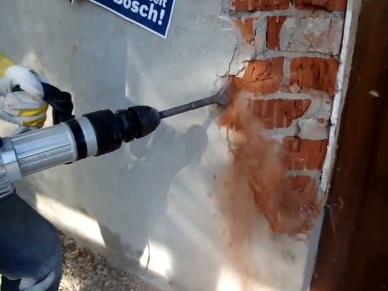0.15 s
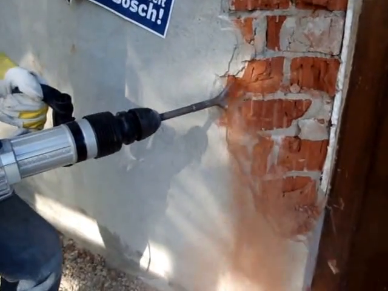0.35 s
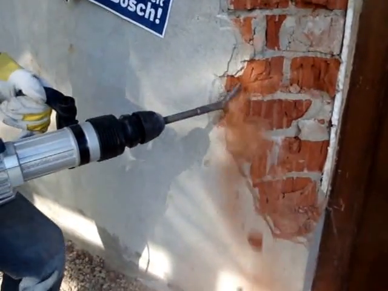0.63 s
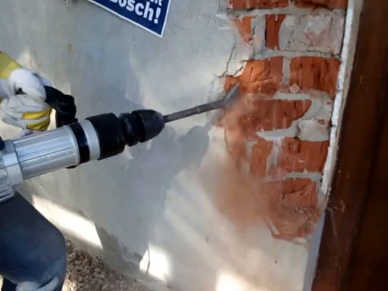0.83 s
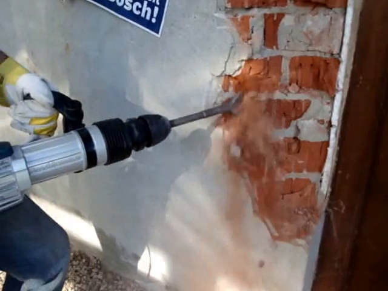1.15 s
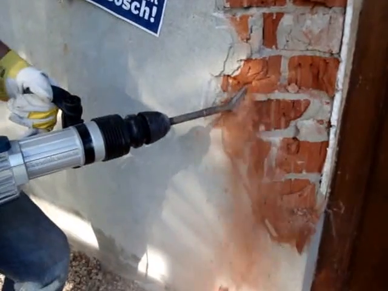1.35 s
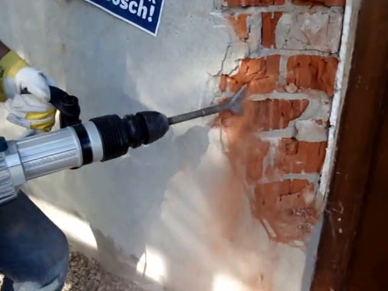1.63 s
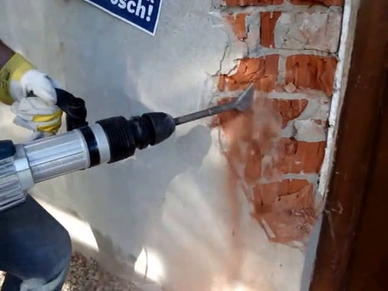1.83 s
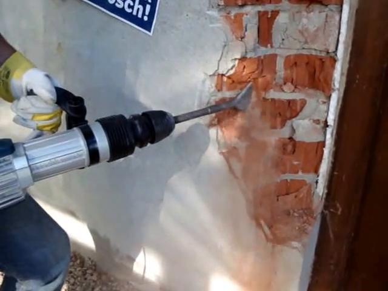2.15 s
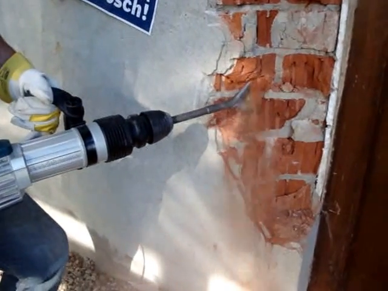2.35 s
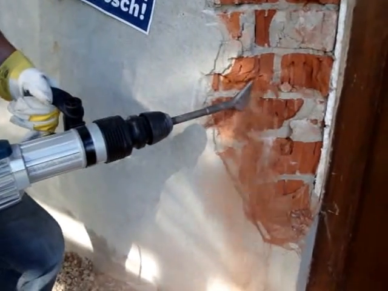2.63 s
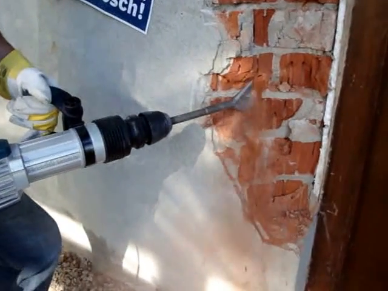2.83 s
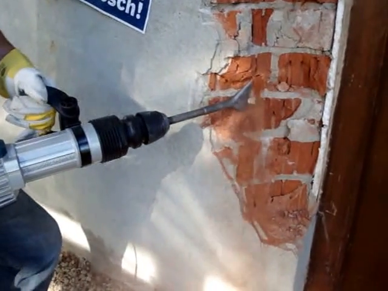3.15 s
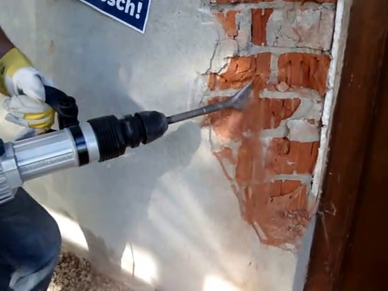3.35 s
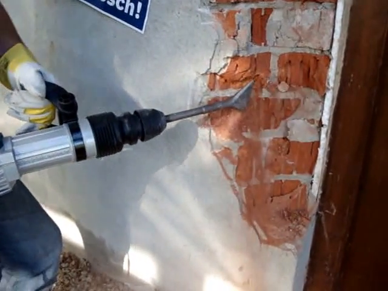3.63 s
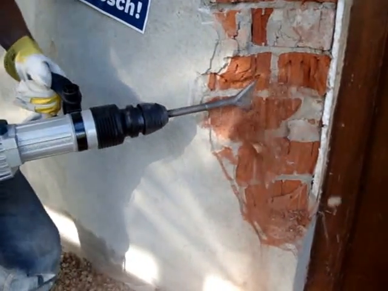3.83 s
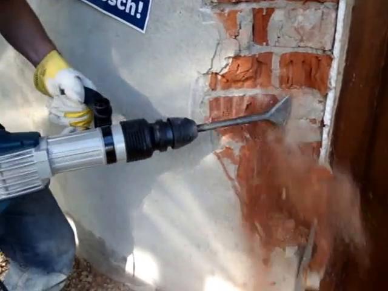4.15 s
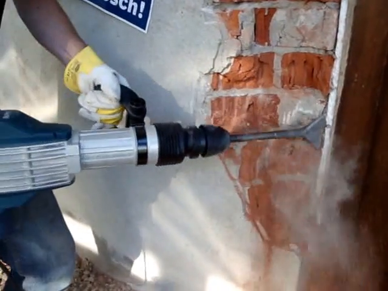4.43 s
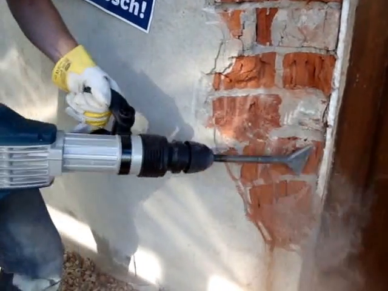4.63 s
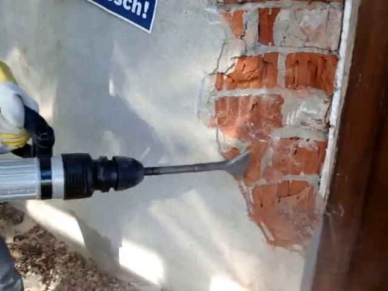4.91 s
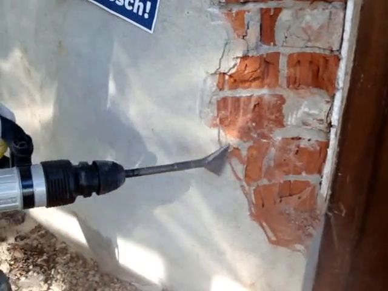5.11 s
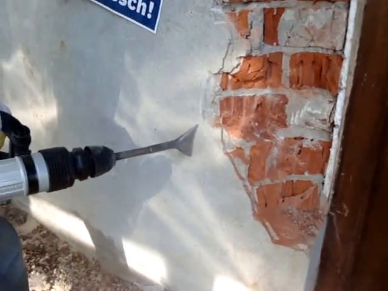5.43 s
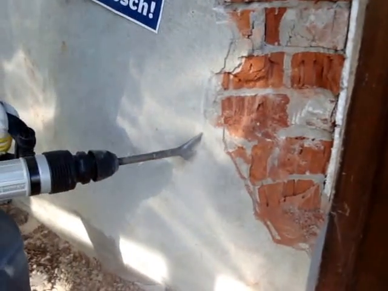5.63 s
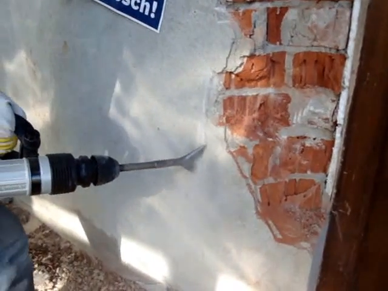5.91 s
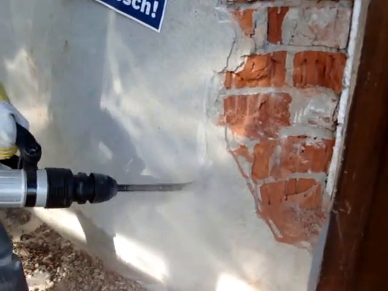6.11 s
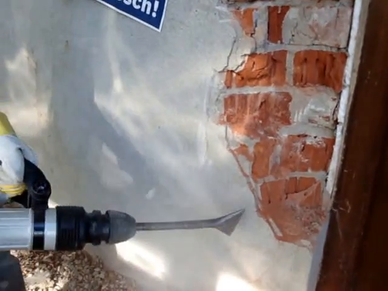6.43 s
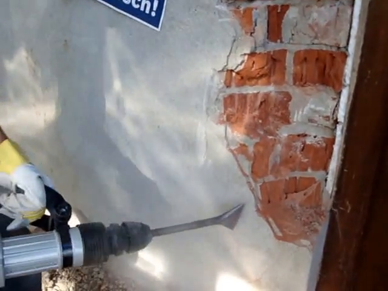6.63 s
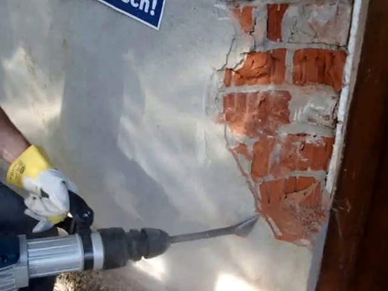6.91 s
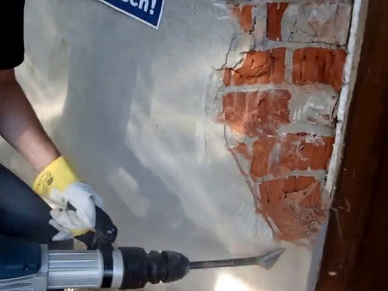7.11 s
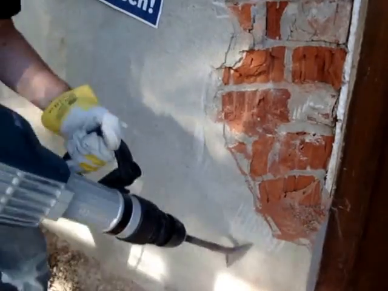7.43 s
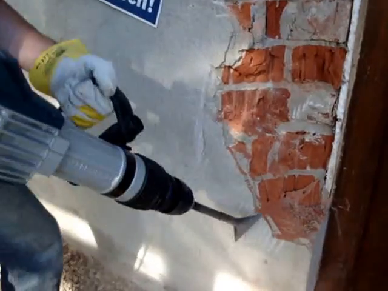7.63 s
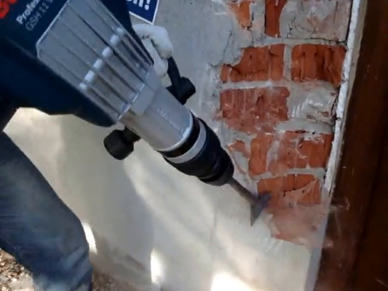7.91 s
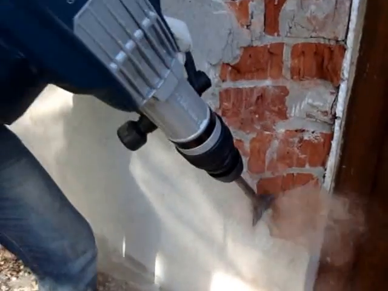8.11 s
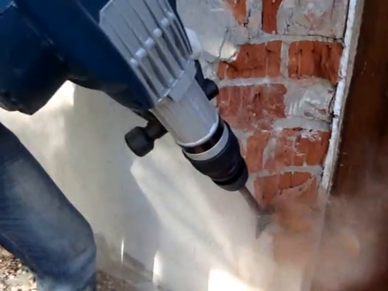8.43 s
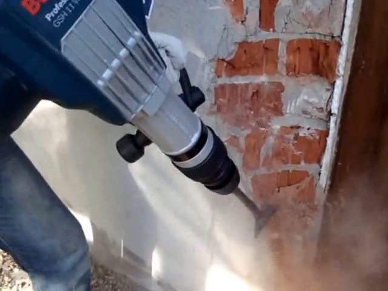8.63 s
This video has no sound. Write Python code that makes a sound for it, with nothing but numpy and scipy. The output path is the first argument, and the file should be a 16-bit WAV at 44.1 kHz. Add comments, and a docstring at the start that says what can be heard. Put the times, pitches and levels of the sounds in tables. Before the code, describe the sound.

An electric demolition hammer chisels plaster off a brick wall, close to the microphone. Very fast blows crack and crunch on the masonry while the steel chisel rings and chips split off. After one long run the tool is lifted three times. Each time its motor whine rises and the gears rattle louder, until a brief squeak and a knock start another short burst of hammering.

```python
"""At a brick wall, one microphone close by: an electric demolition hammer chisels off plaster. About 26 blows a
second crack on the masonry, crush grit and ring the steel chisel, which chatters when it sits loose. Chips
split off and pieces thud to the ground. Three times the tool is lifted: the motor overshoots its free speed,
and the noise swells steadily until a squeak and a knock set it hammering again."""
import sys
import numpy as np
from scipy import signal
from scipy.fft import rfft, irfft, next_fast_len
from scipy.io import wavfile
from scipy.ndimage import uniform_filter1d, map_coordinates

SR = 44100
rng = np.random.default_rng(int(sys.argv[2]) if len(sys.argv) > 2 else 0)


def master(y):
    """Save y as 16-bit WAV."""
    cut = np.clip(np.atleast_2d(y).T, -1, 1)
    pcm = np.round(cut * 32767)  # scale
    wavfile.write(sys.argv[1], SR, pcm.astype(np.int16))


N = 386757
TIME = np.arange(N) / SR
TOP_HZ = 10070  # the microphone's band limit
WHINE_CYCLES_PER_BLOW = 182.6


def amp(db):
    return 10 ** (np.asarray(db) / 20)


def unit(x):
    return x / np.sqrt(np.mean(x ** 2) + 1e-20)


def fade(t, t60):
    return 10 ** (-3 * t / t60)


def curves(rows, at=TIME):
    """Each column after the time, read at the given moments."""
    times, *columns = np.transpose(rows)
    return [np.interp(at, times, column) for column in columns]


def wobble(rate):
    """A smooth random curve, rate knots a second."""
    return map_coordinates(rng.standard_normal(int(N * rate / SR) + 4), [TIME * rate])


def coloured(x, points):
    """x through a causal filter of unit energy shaped by (freq_hz, gain_db) points."""
    size = 2 * next_fast_len(N // 2 + 8192)
    hz, db = np.transpose(points)
    log_hz = np.log(np.fft.rfftfreq(size, 1 / SR) + 1)
    gain = unit(amp(np.interp(log_hz, np.log(hz), db)))
    cepstrum = irfft(np.log(gain))
    cepstrum[1:size // 2] *= 2  # folded for minimum phase
    cepstrum[size // 2 + 1:] = 0
    return irfft(rfft(x, size) * np.exp(rfft(cepstrum)))[:N]


def placed(times, sounds):
    """The sum of short sounds (one a row), each starting at its time."""
    index = np.round(times * SR).astype(int)[:, None] + np.arange(sounds.shape[1])
    return np.bincount(index.clip(0).ravel(), sounds.ravel(), N)[:N]


def struck(blows, db, hz, t60):
    """One mode, rung by every blow; it starts at full swing and so pushes no steady air."""
    t = np.arange(SR // 5) / SR
    swing = np.cos(2 * np.pi * hz * t) * np.where(t > 0, 1, .5)
    return placed(blows, amp(db)[:, None] * fade(t, t60) * swing)


def burst_noise(blows, t, alike):
    """One noise per blow; the share `alike` of its power repeats from blow to blow."""
    repeated = np.sqrt(alike) * rng.standard_normal(len(t))
    return repeated + np.sqrt(1 - alike) * rng.standard_normal((len(blows), len(t)))


# motor speed under load, heard as the fan's whine: time_s, pitch_hz
LOADED_WHINE = [(0, 4831), (2.6, 4808), (4.1, 4780), (4.16, 4920), (4.21, 4780), (4.4, 4765), (5.5, 4800),
                (8.77, 4770)]
# gear rattle under load: time_s, level_db
LOADED_RATTLE = [(0, -32.5), (1.2, -32.5), (1.8, -33), (2.6, -35), (3.5, -34), (4.4, -33.5), (5.5, -32.5),
                 (6.1, -33), (7, -30), (8, -31), (8.7, -31)]
# the tool comes off the wall and runs free; the jolt of the next catch takes a share of its extra speed:
# start_s, rattle_db, swell_db_per_s, air_over_rattle_db, jolt_share, settle_s
TOOL_LIFTS = [(4.441, -35.5, 16.5, -3, 0.028, .22), (6.192, -39, 22.5, -4, .3, .07),
              (7.203, -38, 31, -5.5, .42, .085)]

def drive():
    """Whine pitch, rattle level and fan air level: all rise at each lift and settle after the catch."""
    free_hz, half_swing_s, swing_decay_s = 5250, .36, .29  # the governor overshoots and swings back
    unload_s, rattle_top_db, hush_ratio = .01, -19, 1.33  # noise settles faster than speed
    loaded_hz, = curves(LOADED_WHINE)
    whine_hz, gear_db, air_db = loaded_hz, curves(LOADED_RATTLE)[0], -76
    for (lift, start_db, swell, hiss_db, jolt, settle), (catch, *_) in zip(TOOL_LIFTS, STRIKER_CATCHES):
        t = TIME.clip(lift, catch) - lift
        since_knock = (TIME - catch - KNOCK_LAG_S).clip(0)
        lingering = (1 - jolt * (1 - fade(since_knock, .023))) * np.exp(-since_knock / settle)
        spin_up = 1 - np.exp(-t / swing_decay_s) * np.cos(np.pi * t / half_swing_s)
        whine_hz = whine_hz + (free_hz - loaded_hz) * spin_up * lingering
        free = (1 - np.exp(-t / unload_s)) * lingering ** hush_ratio
        free_db = start_db + swell * t
        gear_db = gear_db + free * (np.minimum(free_db, rattle_top_db) - gear_db)
        air_db = air_db + free * (free_db + hiss_db - air_db)
    return whine_hz, gear_db, air_db


# the fan's outlet turns toward and away from the microphone: time_s, whine_over_rattle_db
WHINE_AIM = [(0, -5), (.3, -3), (.62, -2), (.85, -13), (1.08, -7), (1.4, -6), (1.9, -4), (2.35, -11),
             (2.8, -3), (3.5, -7.5), (4, -5.5), (4.16, -2), (4.3, -6), (4.5, -7), (4.78, -1.5), (5.2, -0.5),
             (5.4, -7), (5.47, -7.5), (5.65, -20), (6.1, -10), (6.5, 0), (6.65, -1.5), (6.82, -12),
             (6.9, -7), (7.3, -11.5), (7.48, 1.5), (7.7, -2), (7.93, 2.5), (7.97, -0.5), (8.25, 1.5),
             (8.77, -1.5)]
# spectra of the gear rattle, the fan's hiss and its drone: freq_hz, gain_db
GEAR_SPECTRUM = [(200, -45), (700, -5.5), (1000, -6), (1100, 5), (1190, 1.5), (1300, 3.5), (1450, 1.5),
                 (1600, 6), (1800, 4.5), (2150, 7), (2900, 5), (3400, 4.5), (4000, 0.5), (5000, -2.5),
                 (8000, -45.5)]
HISS_SPECTRUM = [(300, -39), (1000, 3.5), (3000, -15.5), (5300, 6), (6500, 4), (8500, 2), (9300, -2),
                 (10000, -1)]
DRONE_SPECTRUM = [(20, -34.5), (160, -17), (300, -6), (480, 5.5), (850, 9.5), (1300, -9), (3000, -16)]

def motor(whine_hz, gear_db, air_db, blows):
    """Gears rattle in time with the crank; the fan hisses, drones and whines with the shaft speed."""
    whine_db = gear_db + curves(WHINE_AIM)[0]
    strain = np.interp(whine_hz, [4800, 5200], [1, 0])
    fan_phase = 2 * np.pi * np.cumsum(whine_hz * (1 + .000894 * wobble(60))) / SR
    turn = fan_phase / WHINE_CYCLES_PER_BLOW
    throb_db = np.sin(turn) + .49 * np.sin(2 * turn)
    rattle = rng.standard_normal(N) * amp(throb_db + 2.6 * wobble(450))
    gears = amp(gear_db) * unit(coloured(rattle, GEAR_SPECTRUM))
    air = amp(air_db) * coloured(rng.standard_normal(N), HISS_SPECTRUM)
    drone = amp(.72 * air_db - 24.5) * coloured(rng.standard_normal(N), DRONE_SPECTRUM)
    whine = amp(whine_db - 1.4 * strain) * fan_whine(fan_phase, stroke_angle(blows), strain)
    return gears + air + drone + whine


def fan_whine(phase, stroke, strain):
    """Blade tone and a weak lower partner, rough with turbulence; each compression slows the shaft."""
    sway = -1.2 * strain * np.sin(stroke) + (.45 - .1 * strain) * wobble(220)
    partner = amp(-16 + 4 * wobble(50)) * np.sin(phase * 11 / 13 + sway + wobble(110))
    turbulence = amp(2.3 * wobble(70) + 1.5 * wobble(300) - .5)
    return turbulence * unit(np.sin(phase + sway) + partner)


def gear_mesh(whine_hz, blows):
    """The first gear stage sings; under load its level and pitch swing twice a stroke."""
    mesh_ratio, loaded_db, free_db = 3 / 7, -41.5, -46
    stroke = stroke_angle(blows)
    strain = np.interp(whine_hz, [4900, 5200], [1, 0])
    hz = mesh_ratio * whine_hz * (1 + .022 * strain * np.sin(2 * stroke) + .008 * wobble(150))
    swell_db = loaded_db - 8.3 * np.cos(2 * stroke) - 2.6 * np.sin(stroke)
    level_db = free_db + strain * (swell_db - free_db) + 3 * wobble(120)
    return amp(level_db) * np.sin(2 * np.pi * np.cumsum(hz) / SR)


def stroke_angle(blows):
    """The crank's angle, a whole turn from one blow to the next."""
    return np.interp(TIME, blows, np.arange(len(blows))) * 2 * np.pi


# runs of hammering on the wall: first_blow_s, last_blow_s
HAMMER_RUNS = [(0.0265, 4.0885), (4.163, 4.4710), (5.4450, 6.1840), (6.8460, 7.1860), (7.9547, 8.7540)]

def blow_times(whine_hz):
    """The striker hits the chisel once per crank turn, from the first blow of a run to its last."""
    turns = np.cumsum(whine_hz) / SR / WHINE_CYCLES_PER_BLOW
    spans = [np.interp(run, TIME, turns) for run in HAMMER_RUNS]
    blow_turns = [np.linspace(first, last, round(last - first) + 1) for first, last in spans]
    return np.interp(np.concatenate(blow_turns), turns, TIME)


# how hard the edge bites, full on brick and weak on plaster: time_s, level_db
EDGE_BITE = [(0, -22.5), (.16, -14), (.6, -20), (.95, -18), (1.3, -17), (1.75, -21), (2.07, -21.5),
             (2.5, -24.5), (2.9, -20), (3.15, -18.5), (3.35, -22.5), (3.8, -18.5), (4.3, -20.5),
             (5.5, -16.5), (5.75, -20.5), (6.08, -19), (6.19, -28), (6.9, -22.5), (7.15, -21.5),
             (8.05, -19.5), (8.4, -23), (8.7, -20.5)]
# the dull thud of the wall behind the brick: time_s, level_db
THUD_LEVEL = [(0, -11), (.25, -7.5), (.55, -7.5), (.7, -8), (1.2, -8.5), (1.5, -9), (1.8, -17), (1.95, -9),
              (2.3, -8), (2.5, -5), (3.3, -9), (3.6, -2), (4.05, -14), (5.5, -21.5), (6.1, -20.5),
              (7, -14.5), (8, -1.5), (8.3, -4.5), (8.7, -12.5)]
# the tip rubs on crushed grit and skids on hard brick: time_s, grit_db, skid_db
TIP_RUBBING = [(0, -38, -30.5), (.35, -31.5, -26.5), (.75, -29, -47), (1.05, -34.5, -41),
               (1.25, -30.5, -28), (1.55, -33, -26.5), (1.72, -36.5, -32), (1.95, -31, -42),
               (2.3, -26.5, -42), (2.6, -31, -28), (3.1, -35, -37), (3.65, -30, -32), (3.9, -33, -38),
               (4.3, -36.5, -33.5), (5.45, -28.5, -28.5), (5.7, -32.5, -20), (5.83, -29.5, -31),
               (6.08, -30.5, -29), (6.19, -34, -30), (6.87, -31.5, -30.5), (7.18, -35.5, -30),
               (8, -33, -28), (8.4, -34.5, -32.5), (8.7, -33, -28.5)]
# spectra of a blow, close to the tip: freq_hz, gain_db
CRACK_SPECTRUM = [(20, -29), (60, -17), (130, -23.5), (200, -7), (300, -14.5), (500, -8.5), (1200, 1),
                  (2400, 4.5), (3400, 5.5), (4800, 2), (7000, 11.5), (10000, -11)]
CRUNCH_SPECTRUM = [(200, -35), (600, -22.5), (1300, -10.5), (1900, 3.5), (2400, -8), (3000, -0.5),
                   (3800, -17), (5000, -19), (7500, -2.5), (10000, -7.5)]
THUD_SPECTRUM = [(200, -24.5), (380, -13), (500, -4), (800, -1), (1200, 8.5), (1600, -9), (3000, -35.5)]
WALL_SPECTRUM = [(100, -31.5), (400, -17), (1000, -13.5), (1900, -8), (2500, -0.5), (3100, 0), (3600, -4.5),
                 (4400, -6.5), (5200, -31.5), (8000, -18)]
GRIT_SPECTRUM = [(1500, -24.5), (4000, -0.5), (5100, -4.5), (5650, -1), (6150, -10.5), (6750, -13.5),
                 (7450, 7), (8000, -0.5), (8500, 7), (9200, -7), (9750, -1.5), (10200, -17.5)]
SKID_SPECTRUM = [(4500, -44), (5250, -8.5), (5520, 6), (5720, -1.5), (6000, -3), (6800, -38.5)]

def masonry(blows):
    """The edge cracks and crunches in, the wall thuds and answers, grit hisses and the flat tip rasps."""
    grit_db, skid_db = curves(TIP_RUBBING, blows[:, None])
    bite_db, = curves(EDGE_BITE, blows[:, None])
    thud_db, = curves(THUD_LEVEL, blows[:, None])
    t = np.arange(SR // 12) / SR
    strength, crush, life = rng.standard_normal((len(blows), 3)).T[:, :, None]
    force = amp(bite_db + 1.2 * strength)
    impulses = -(force / force.mean()) ** .7 * amp(.5)
    crack = coloured(placed(blows, impulses), CRACK_SPECTRUM)
    crunch = force * amp(-3.5) * fade(t, t60=.018) * burst_noise(blows, t, alike=.83)
    thud = coloured(placed(blows + .0006, amp(thud_db)), THUD_SPECTRUM)
    answer = force * amp(-5) * fade(t, t60=.055) * burst_noise(blows, t, alike=.72)
    wall = coloured(placed(blows, answer), WALL_SPECTRUM)
    # a loose chisel keeps scraping for longer
    contact_s = (.012 + .016 * looseness(blows)[:, None]) * np.exp(.25 * life)
    contact = fade(t, t60=.38) / (1 + (t / contact_s) ** 6)
    grit = amp(grit_db + 7.2 + 2 * crush) * contact * burst_noise(blows, t, alike=.27)
    crumbling = amp(3.2 * wobble(600) - .3)
    skid = amp(skid_db + .5) * contact * burst_noise(blows, t, alike=.28)
    layers = [(crunch, CRUNCH_SPECTRUM), (grit, GRIT_SPECTRUM), (skid, SKID_SPECTRUM)]
    crushed = sum(coloured(placed(blows, bursts) * crumbling, spectrum) for bursts, spectrum in layers)
    return crack + thud + wall + crushed


# the brick clanks under the edge: time_s, level_db, pitch_hz
BRICK_CLANK = [(0, -36, 2300), (.2, -20.5, 2450), (.48, -30, 2300), (.7, -16, 2350), (.95, -21.5, 2190),
               (1.3, -19, 2310), (1.7, -16, 2590), (1.84, -20.5, 2530), (2.07, -15.5, 2480),
               (2.3, -19.5, 2530), (2.6, -20.5, 2530), (3.1, -22.5, 2610), (3.45, -31, 2480),
               (3.75, -28, 2500), (4.3, -26, 2430), (5.5, -18, 2320), (6.05, -24, 2430), (6.19, -35, 2400),
               (6.9, -26, 2400), (7.15, -30, 2430), (8.05, -18, 2130), (8.4, -25, 2203), (8.7, -21, 2300)]
# its partials, the lowest rung as the edge slips and bites again: pitch_ratio, gain_db, t60_s, delay_s
CLANK_PARTIALS = [(.77, -4.5, 0.011, .0036), (.79, 1, 0.0051, 0.00023), (.88, -2.5, 0.023, 0.00037),
                  (1, 0.5, 0.022, 0.00033), (1.13, -9.5, .02, 0.00026), (1.68, -27, 0.012, 0.00016)]
# a higher ping where the corner of the edge digs into hard brick: time_s, level_db
CORNER_PING = [(0, -47), (.18, -25), (.33, -22), (.45, -20.5), (.7, -22), (.95, -24), (1.1, -31),
               (1.24, -24), (1.45, -36), (1.85, -30), (2.07, -16), (2.2, -21), (2.42, -18.5), (2.6, -24),
               (2.7, -15.5), (2.87, -34), (3.1, -22), (3.35, -32), (3.6, -22.5), (4.3, -38), (5.9, -21.5),
               (7.1, -31), (8.7, -35)]

def clanks(blows):
    """The brick clanks and pings; pitch and strength shift from blow to blow as the edge creeps."""
    clank_db, clank_hz = curves(BRICK_CLANK, blows)
    creep, force, ping_shift, ping_force = rng.standard_normal((len(blows), 4)).T
    ping_hz = 3397 * np.exp(.043 * ping_shift)
    ping_db = curves(CORNER_PING, blows)[0] + 1.5 * ping_force
    sound = struck(blows + .0009, ping_db, ping_hz[:, None], t60=.043)
    for k, (ratio, gain_db, t60, delay) in enumerate(CLANK_PARTIALS):
        shift, level = rng.standard_normal((len(blows), 2)).T
        hz = ratio * clank_hz * np.exp(.024 * (creep + shift))
        db = clank_db + gain_db + force + 1.5 * level
        sound += (-1) ** k * struck(blows + delay, db, hz[:, None], t60)
    return sound


# the chisel's ring as its edge binds and comes free: time_s, level_db
RING_LEVEL = [(0, -34), (.55, -38.5), (.65, -31), (.72, -31.5), (.88, -37.5), (1.05, -32.5), (1.27, -30),
              (1.4, -33.5), (1.53, -37), (1.67, -45), (1.79, -29), (1.9, -30.5), (1.99, -33.5), (2.08, -25),
              (2.17, -27.5), (2.33, -31.5), (2.45, -29.5), (3.05, -31), (3.33, -40), (3.55, -35),
              (3.66, -31), (3.74, -38), (3.85, -27), (4.07, -40.5), (4.24, -29), (4.47, -36), (5.5, -36),
              (5.9, -40.5), (6.15, -35), (6.846, -33.5), (6.882, -30), (6.92, -33.5), (7, -35.5),
              (7.1, -38), (7.15, -37.5), (8.08, -33.5), (8.33, -33.5), (8.77, -32.5)]
# the steel's lengthwise modes: pitch_hz, struck_db, rebound_db, t60_s
STEEL_MODES = [(6660, -3, 7.5, 0.099), (6643, 7.5, 7.5, 1), (6800, 4, 3.5, 0.11), (6600, -14, -1, 0.038),
               (7110, 4, 11, 0.016), (7150, -3, 1.5, 0.021), (8330, -4, -6, 0.0059),
               (9840, -2, 1.5, 0.0076)]
# a loose chisel rebounds between blows: delay_s, scatter_s, gain_db, flight_s
CHISEL_REBOUNDS = [(0.017, 0.0044, 5.5, 0.01), (.028, 0.0086, 0.5, 0.0081)]

def chisel(blows):
    """Each blow rings the steel until the wall damps it; when loose it chatters in short rebounds."""
    chip_change_db = np.bincount(chip_blows(blows), np.transpose(BRICK_CHIPS)[3], len(blows))
    ring_db = curves(RING_LEVEL, blows)[0] + chip_change_db
    modes = np.array(STEEL_MODES)
    struck_modes, rebound_modes = modes[:, [0, 1, 3]], modes[:, [0, 2, 3]]
    flight_s = .017 * amp(.5 * (ring_db[:, None] + 29).clip(-4, 5))  # louder rings last longer
    blow_db = ring_db + 4.5 + .5 * rng.standard_normal(len(blows))
    ring = steel_ring(blows, blow_db, flight_s, struck_modes)
    loose_db = 10 * np.log10(looseness(blows) + .025)
    for delay, scatter, gain_db, hop_s in CHISEL_REBOUNDS:
        lag, kick = rng.uniform(-1, 1, (len(blows), 2)).T
        rebound_db = ring_db + gain_db + loose_db + 4 * kick
        ring += steel_ring(blows + delay + scatter * lag, rebound_db, hop_s, rebound_modes)
    return ring * amp(1.7 * wobble(450))


def steel_ring(times, force_db, flight_s, modes):
    """The chisel rings for as long as it is in the air and wavers as it rubs in its holder."""
    grip_s, rise_per_s = .018, 8.5  # late in a long flight the wall's grip bends the pitch up
    t = np.arange(SR // 20) / SR
    airborne_s = flight_s * np.exp(.18 * rng.standard_normal((len(times), 1)))
    climb = rise_per_s / 2 * (t - grip_s).clip(0) ** 2
    rubbing = unit(uniform_filter1d(rng.standard_normal((len(times), len(t))), size=90))
    waver = np.cumsum(rubbing, axis=1) / SR
    ring = 0
    for hz, db, t60 in modes:
        level, detune, phase = rng.uniform(-1, 1, (len(times), 3)).T[:, :, None]
        angle = 2 * np.pi * hz * (t + .009 * detune * t + .008 * waver + climb) + np.pi * phase
        ring = ring + amp(db + 3 * level) * fade(t, t60) * np.sin(angle)
    envelope = (1 - np.exp(-t / .0012)) / (1 + (t / airborne_s) ** 7)
    return placed(times, amp(force_db)[:, None] * ring * envelope)


# buzz of the housing, fullest while the chisel is wedged tight: time_s, level_db
BUZZ_LEVEL = [(0, -47), (.3, -43), (.7, -55), (1.3, -51), (1.7, -49), (1.84, -58), (1.95, -51), (2.3, -40),
              (2.55, -41), (3.1, -33), (3.55, -36), (3.9, -53), (4.1, -54), (4.27, -56), (5.5, -52),
              (6.1, -48), (7, -56), (8.7, -52)]
# the housing's panels: pitch_hz, gain_db, t60_s
HOUSING_MODES = [(186, -26, 0.035), (248, -29, 0.098), (592, -22, 1), (687.5, 3, 0.064), (768, -0.5, 0.22),
                 (894, -9.5, 0.062), (947, -8, 0.25), (1122, -11.5, 0.057), (1378, 4.5, 0.031),
                 (1940, -9, 0.15)]

def housing(blows):
    """Panel modes outlast the gap between blows and build up a pitched buzz."""
    buzz_db, = curves(BUZZ_LEVEL, blows)
    buzz = np.zeros(N)
    for k, (hz, db, t60) in enumerate(HOUSING_MODES):
        drift = 1 + .004 * wobble(3)[(blows * SR).astype(int), None]  # changing pressure on the handles
        arrivals = blows + .0011 * k  # the shock reaches each panel a little later
        buzz += struck(arrivals, buzz_db + db, hz * drift, t60)
    return buzz


# the chisel's bending tone, growing as it is levered: time_s, level_db
BEND_LEVEL = [(0, -36), (1.3, -29), (2, -32), (2.8, -24.5), (3.7, -34.5)]

def chisel_bend(blows):
    """Each blow also rings the low bending mode of the leaning chisel."""
    return struck(blows, curves(BEND_LEVEL, blows)[0], hz=1685, t60=.082)


# hollow plaster under the tip: time_s, level_db, pitch_hz
HOLLOW_PLASTER = [(0, -39, 562), (.2, -33, 560), (.55, -37, 566), (.66, -46.5, 498), (1.3, -39.5, 477),
                  (1.7, -38.5, 498), (1.84, -46, 490), (1.93, -35.5, 490), (2.4, -37.5, 490),
                  (3.1, -34, 490), (3.55, -35.5, 497), (3.75, -41, 480), (4.4, -59, 480)]

def plaster_boom(blows):
    """The hollow plaster booms at each blow, lower as the tip moves on."""
    db, hz = curves(HOLLOW_PLASTER, blows)
    return struck(blows, db, hz[:, None], t60=.085)


# how hard the tool is leaned on: time_s, clatter_db, steady_share
TOOL_LOAD = [(0, -42.5, 0.9), (.25, -38.5, 0.86), (.65, -41.5, 0.9), (1.3, -39, 1), (1.72, -42, 0.73),
             (1.84, -48, 1), (1.95, -37.5, 1), (2.3, -43, 1), (2.6, -39, 1), (3.55, -39.5, 1),
             (3.9, -38, 1), (4.08, -44.5, 0), (4.27, -42, 1), (4.45, -45.5, 0.73), (5.5, -42, 0.1),
             (6.1, -43.5, 0.6), (7, -40, 0.56), (8.77, -42, 0)]
# spectrum of the piston and crank: freq_hz, gain_db
CRANK_SPECTRUM = [(20, -35), (125, -16), (185, -6), (270, -7), (330, -10.5), (430, -4), (490, 6.5),
                  (540, 3), (590, 1), (700, 3), (1050, 6.5), (1550, -10.5), (2080, 4), (4000, -49)]

def crank(blows):
    """Piston and crank clatter through the same pattern on every stroke while the tool is held steady."""
    stroke_samples = SR // 26
    pattern = unit(irfft(np.exp(2j * np.pi * rng.random(stroke_samples // 2 + 1))))
    clatter_db, steady = curves(TOOL_LOAD, blows[:, None])
    stray = rng.standard_normal((len(blows), len(pattern)))
    strokes = np.sqrt(steady) * pattern + np.sqrt(1 - steady) * stray
    return coloured(placed(blows, amp(clatter_db) * strokes), CRANK_SPECTRUM)


def looseness(times):
    """How loosely the chisel sits, 0-1: loose when the tool is unsteady."""
    return 1 - curves(TOOL_LOAD, times)[1]


def crumbs(blows, count):
    """After each blow a few crumbs of grit are nipped under the edge, each with its own short tick."""
    starts = np.repeat(blows, count)
    lag, size, pitch = rng.standard_normal((len(starts), 3)).T
    delay_s = (.018 + .01 * lag).clip(.002)
    hz = (7340 * np.exp(.2 * pitch)).clip(0, TOP_HZ)
    db = curves(TIP_RUBBING, starts)[0] - 4 + 8.5 * size.clip(-2, 2)
    return struck(starts + delay_s, db, hz[:, None], t60=.011)


# chips split off and may smother the chisel: time_s, level_db, pitch_hz, ring_change_db
BRICK_CHIPS = [(.556, -3.5, 2160, 4), (.594, -9, 2400, -5), (.821, 0, 2740, -13), (.934, -16, 1940, -3),
               (1.086, -2, 2650, -32), (1.275, -10, 2460, -1), (1.692, -10, 2680, 0), (1.881, -9, 2700, 3),
               (1.919, -8, 2760, 0.5), (2.069, -18, 2550, -5), (2.107, -15, 2900, -1.5),
               (2.413, -6, 2570, 3), (2.451, -5, 2880, -2), (2.565, -10, 2520, -0.5),
               (2.603, -17, 2520, 0.5), (2.716, -15, 2730, -2), (4.089, -9, 3620, -22),
               (4.355, -12, 3120, 1.5), (4.393, -9, 2980, -16), (5.621, -12, 2400, 6)]

def chips(blows):
    """Splitting brick gives a short, hard clank of two partials."""
    _, db, hz, _ = np.transpose(BRICK_CHIPS)
    starts = blows[chip_blows(blows)] + .0005
    lower = struck(starts, db - 10.5, hz[:, None], t60=.025)
    upper = struck(starts, db - 15.5, 1.2 * hz[:, None], t60=.044)
    return lower - upper


def chip_blows(blows):
    """The nearest blow splits off each chip."""
    return np.abs(blows - np.array(BRICK_CHIPS)[:, :1]).argmin(axis=1)


# pieces of brick land at the foot of the wall: start_s, level_db
LANDINGS = [(0.652, -50), (1.162, -66), (1.212, -38), (4.157, -38)]

def falling_pieces():
    """Falling pieces hit the ground with soft thuds."""
    starts, db = np.transpose(LANDINGS)
    t = np.arange(SR // 4) / SR
    thuds = amp(db)[:, None] * fade(t, t60=.75) * rng.standard_normal((len(starts), len(t)))
    return coloured(placed(starts, thuds), [(30, -17), (200, 2), (400, 3.5), (1200, -4)])


# the edge skates over the wall before it bites: start_s, length_s, level_db
EDGE_SKATES = [(4.395, 0.033, -27.5), (5.457, 0.087, -32), (6.84, 0.067, -24), (6.912, 0.14, -29),
               (7.968, .03, -25)]
# spectrum of that rasp: freq_hz, gain_db
SCRAPE_SPECTRUM = [(300, -14), (600, 1), (1500, -1), (2300, 6.5), (3600, 3), (5000, 2.5), (7000, -8),
                   (8600, -2), (10000, -4)]

def scrapes():
    """The skating edge sticks and slips in a dense, uneven rasp."""
    slips_per_s, slip_depth_db = 810, 4
    envelope = sum(amp(db) * np.exp(-(2 * (TIME - start) / length - 1) ** 6)
                   for start, length, db in EDGE_SKATES)
    slips = unit(amp(slip_depth_db * wobble(slips_per_s)) * rng.standard_normal(N))
    return coloured(envelope * slips, SCRAPE_SPECTRUM)


# the howl grows as the tool is tipped toward the microphone: time_s, gain_db
HOWL_AIM = [(4.5, -1), (5.2, 5.5), (5.45, -5), (6.8, -8), (7.5, 8), (7.7, 7), (7.85, 1), (7.96, 4),
            (8.1, 0)]
# hollow resonance of the gear case: freq_hz, gain_db
CASE_SPECTRUM = [(700, -47.5), (1020, -12.5), (1105, 5), (1180, -3), (1290, 2.5), (1370, 5.5), (1470, -25),
                 (2000, -55)]

def gear_case(gear_db):
    """The gear case howls, rising and falling with the free-running noise as it swells."""
    howl_db = 1.75 * gear_db + 3.5 + curves(HOWL_AIM)[0]
    return amp(howl_db) * coloured(rng.standard_normal(N), CASE_SPECTRUM)


KNOCK_LAG_S = .009
# the striker is caught up again: time_s, pitch_hz, squeak_db, half_length_s, knock_db
STRIKER_CATCHES = [(5.432, 2220, -9, 0.017, -8), (6.841, 2300, 6, 0.0045, -20),
                   (7.9464, 2170, 12, 0.0038, -18.5)]

def catches():
    """The chisel is pushed home: a short squeak, then a hard knock that thuds through the housing."""
    squeaks, knocks, thud_envelope = np.zeros((3, N))
    for time_s, hz, squeak_db, half_length_s, knock_db in STRIKER_CATCHES:
        swell = np.exp(-2 * ((TIME - time_s) / half_length_s) ** 2)
        level = amp(squeak_db - 20.5 + .68 * wobble(410))
        squeaks += level * swell * np.sin(2 * np.pi * hz * TIME + .27 * wobble(360))
        t = TIME - time_s - KNOCK_LAG_S
        knocks[np.argmax(t >= 0)] = -amp(knock_db + 23.5)
        thud_envelope += amp(knock_db - 34) * (t >= 0) * fade(np.abs(t), t60=.22)
    housing_spectrum = [(30, -11), (180, -12), (400, 11), (1200, -34)]
    thuds = coloured(thud_envelope * rng.standard_normal(N), housing_spectrum)
    return squeaks + coloured(knocks, CRACK_SPECTRUM) + thuds


def scene():
    """One motor drives the blows, the gears and the fan, all heard in mono beside the wall."""
    whine_hz, gear_db, air_db = drive()
    blows = blow_times(whine_hz)
    brick = masonry(blows) + clanks(blows) + chips(blows) + crumbs(blows, count=5) + plaster_boom(blows)
    tool = chisel(blows) + chisel_bend(blows) + housing(blows) + crank(blows)
    machine = motor(whine_hz, gear_db, air_db, blows) + gear_mesh(whine_hz, blows) + gear_case(gear_db)
    return (brick + tool + machine + catches() + scrapes() + falling_pieces())[None]


def record(dry):
    """The microphone rounds off the highest peaks and keeps nothing above its band limit."""
    rounded = dry / (1 + np.abs(dry / .85) ** 6) ** (1 / 6)
    lowpass = signal.firwin(601, TOP_HZ, fs=SR, window="blackman")
    return signal.fftconvolve(rounded, lowpass[None], mode="same", axes=1)


dry = scene()
out = record(dry)
master(out)
```